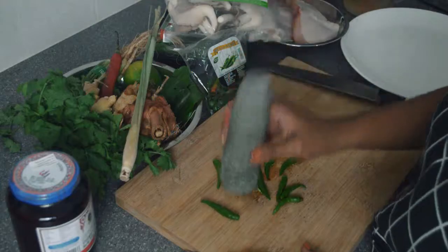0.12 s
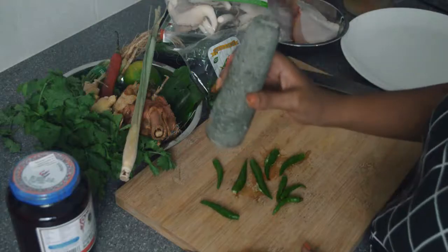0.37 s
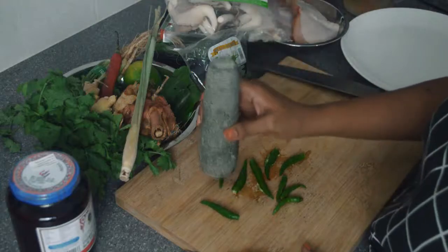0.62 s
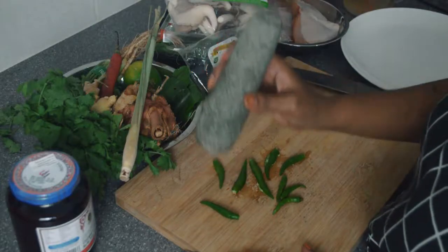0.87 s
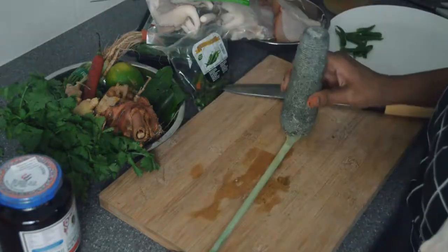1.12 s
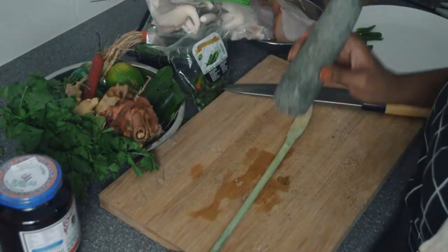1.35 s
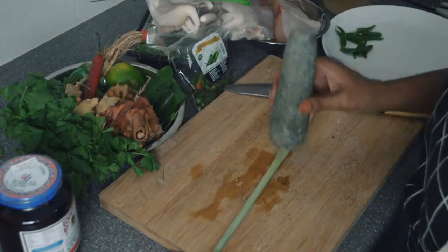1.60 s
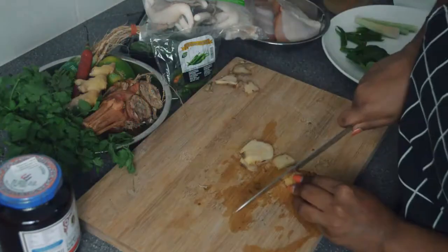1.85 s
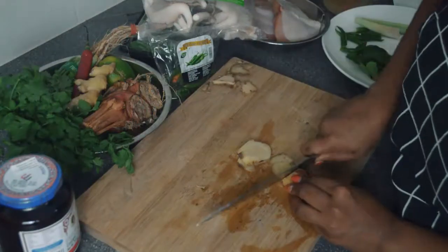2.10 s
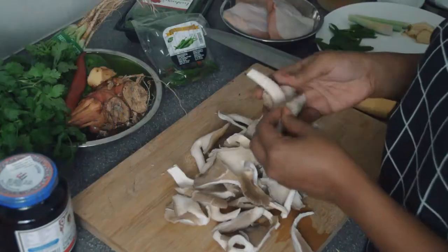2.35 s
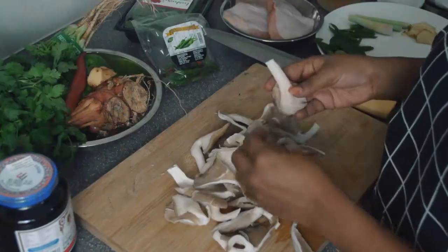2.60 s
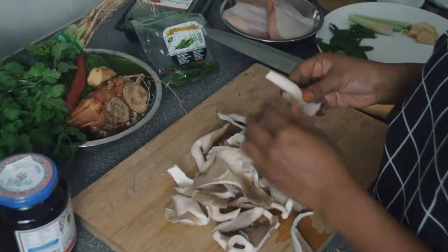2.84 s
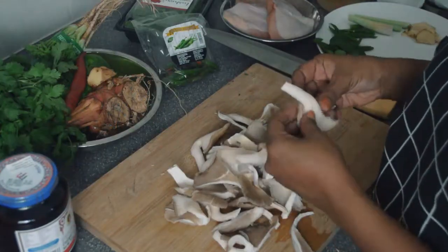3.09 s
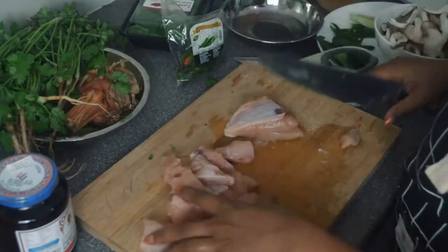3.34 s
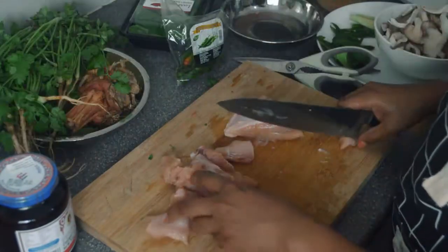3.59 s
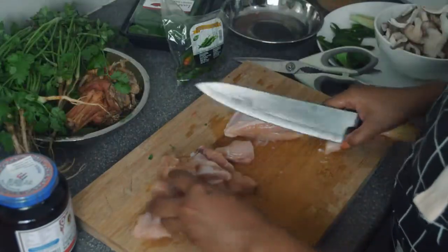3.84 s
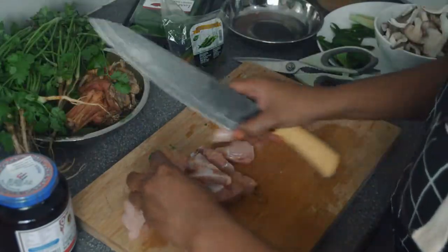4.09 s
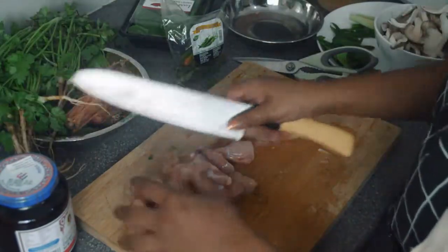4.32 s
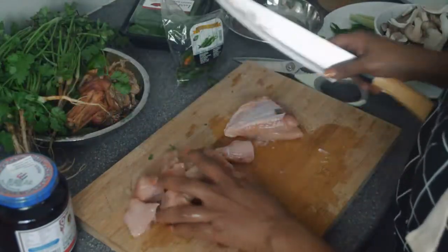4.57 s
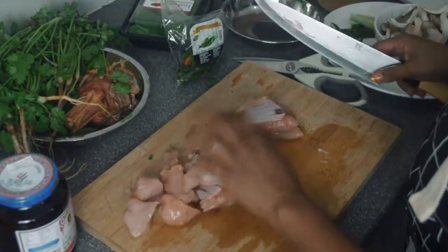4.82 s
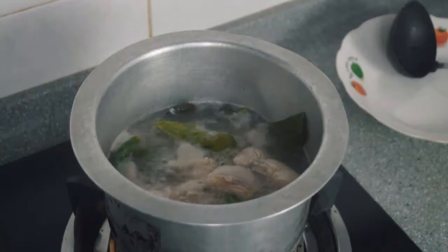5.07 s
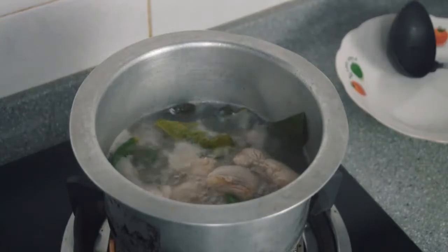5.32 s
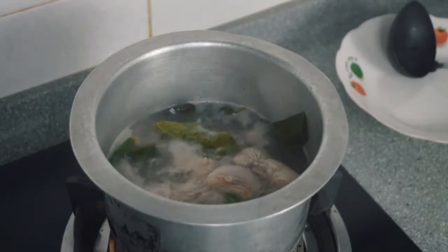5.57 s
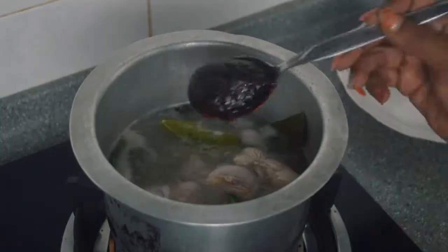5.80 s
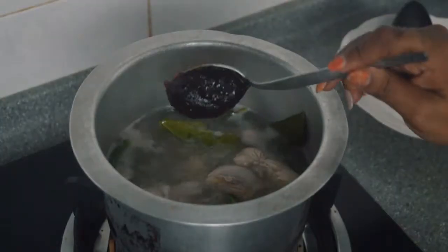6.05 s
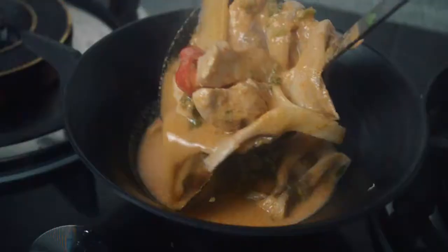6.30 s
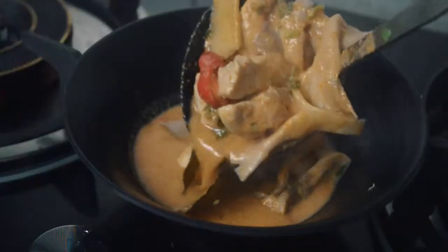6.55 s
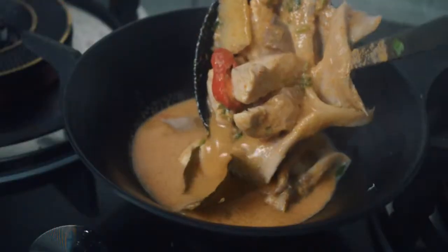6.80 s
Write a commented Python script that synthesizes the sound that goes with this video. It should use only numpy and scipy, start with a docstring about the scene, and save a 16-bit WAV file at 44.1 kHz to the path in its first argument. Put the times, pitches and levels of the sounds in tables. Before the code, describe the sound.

Loud start, quiet finish: two crunchy pestle knocks, two heavier ones with rattling metal, then a short slice ending in a sharp wooden knock. After that come soft wet rustles and small taps on the board, a faint fizzing pot with tiny snaps and bubble plops, and a low wavering fan hum. Close mono pickup in a lively kitchen; each scene change cuts off the previous echo abruptly.

```python
"""Quick cuts through a home kitchen

A stone pestle pounds a wooden board four times: crackling grains, a struck board and loose clatter, with
metal ware jingling beside it. A knife hisses through a root and lands, hands rustle and tap food about in
puffs of noise, a pot simmers in tiny chirps, snaps and plops, and a stove fan hums as wavering sines.
Coloured noise gives each scene its room tone, and each cut chops off the echo of the scene before it."""
import sys
import numpy as np
from scipy import signal
from scipy.fft import rfft, irfft
from scipy.io import wavfile
from scipy.ndimage import uniform_filter1d

SR = 44100
rng = np.random.default_rng(int(sys.argv[2]) if len(sys.argv) > 2 else 0)


def store_wav(level_fs):
    """Save 16-bit WAV to argv[1]."""
    pcm = np.round(np.clip(np.atleast_2d(level_fs), -1, 1) * 32767)
    wavfile.write(sys.argv[1], SR, pcm.T.astype(np.int16))


def to_linear_factor(level_db):
    """Convert decibel levels (scalar or array-like) to linear amplitude factors."""
    exponent = np.asarray(level_db, float) / 20
    return 10 ** exponent


N = 305436
T = np.arange(N) / SR  # the time line in seconds


def evened(x):
    """Scales to rms 1."""
    return x / np.sqrt(np.mean(x ** 2) + 1e-20)


def read(points, hz):
    """Reads a spectrum on a log frequency axis."""
    f, value = np.transpose(points)
    return np.interp(np.log(hz + 1), np.log(f + 1), value)


def coloured(x, points):
    """Shapes the spectrum without shifting phases; rms 1."""
    gain = to_linear_factor(read(points, np.fft.rfftfreq(len(x), 1 / SR)))
    return evened(irfft(rfft(x) * gain, len(x)))


def band(x, hz, octaves):
    """Band-pass reaching the given octaves to each side of hz."""
    edges = np.clip([hz / 2 ** octaves, hz * 2 ** octaves], 30, SR / 2.2)
    return signal.sosfilt(signal.butter(2, edges, "bandpass", fs=SR, output="sos"), x)


def ring(modes, place_hz=900, focus_db=0, split=0):
    """Decaying sines, peak 1; modes far from place_hz are struck less; split pairs beat."""
    t = np.arange(SR // 2) / SR
    out = 0
    for k, (hz, db, t60) in enumerate(modes):
        off_place_db = focus_db * np.log2(hz / place_hz) ** 2
        struck = (-1) ** k * to_linear_factor(db - off_place_db - 60 * t / t60)  # neighbours start in opposite directions
        twin = 0.64 * np.sin(2 * np.pi * hz * (1 + split) * t)
        out = out + struck * (np.sin(2 * np.pi * hz * t) + twin)
    return out / abs(out).max()


def grains(size, spread_db, per_s, hiss):
    """Sparse clicks of very unequal size over some plain hiss."""
    chance = rng.random((size, 2))
    noise = rng.standard_normal((size, 2))
    sizes = to_linear_factor(-spread_db * np.log(chance[:, 0] + 0.078))
    clicks = sizes * (chance[:, 1] < per_s / SR)
    return evened(clicks * np.sign(noise[:, 0])) + hiss * noise[:, 1]


def rustle(colour, spread_db, per_s, hiss, blur):
    """Friction: noise in uneven puffs that last about blur (s)."""
    puffs = signal.lfilter([1], [1, -np.exp(-1 / (blur * SR))], abs(grains(N, spread_db, per_s, 0)))
    return coloured((evened(puffs) + hiss) * rng.standard_normal(N), colour)


# How long the kitchen echoes. Each row: frequency in Hz, t60 in seconds.
ROOM = [(60, 0.53), (160, 0.32), (420, 0.54), (1100, 0.49), (2910, 0.46), (7680, 0.39), (11000, 0.41),
        (15000, 0.067)]


def room(x, wet_db):
    """Hard kitchen walls: sparse taps of random sign, each band dying at its own speed."""
    taps, at = np.zeros(SR), np.arange(120, SR - 10, 10)
    taps[at + rng.integers(0, 10, len(at))] = rng.choice([-1., 1.], len(at))
    hz, t, z = signal.stft(taps, SR, nperseg=512)
    decay = to_linear_factor(-60 * t / read(ROOM, hz)[:, None])
    tail = signal.istft(z * decay, SR, nperseg=512)[1][:SR]
    wet = signal.fftconvolve(x, tail / np.linalg.norm(tail))[:SR]
    return to_linear_factor(wet_db) * wet + np.pad(x, (0, SR - len(x)))


# The edges of the six scenes, counted from 0. One row: times in seconds.
CUTS = [.083, 1.0, 1.768, 2.268, 4.902, 6.328, 7]


def scene_at(s):
    """Number of the scene that is heard at s."""
    return int(np.searchsorted(CUTS, s)) - 1


def add(mix, s, sound, scene_number):
    """Mixes a sound in at s, heard only between the two cuts of its scene."""
    at = round(s * SR) + np.arange(len(sound))
    heard = (at >= CUTS[scene_number] * SR) & (at < min(CUTS[scene_number + 1] * SR, N))
    mix[at[heard]] += sound[heard]


def fade_in():
    """Gain in dB of the fade that opens the pot scene."""
    from_db, fade_s = -15.5, 0.35
    since = T - CUTS[4]
    return from_db * np.clip(1 - (since / fade_s) ** 2, 0, 1) * (since > 0)


def strokes(rows, number):
    """Each stroke swells to its peak and dies away; gains of the main layer and of the second one."""
    range_db = 29  # drop below the peak at the far end of a rise or fall
    main, second = np.zeros((2, N))
    for s, db, rise, fall, second_db in rows:
        power = to_linear_factor(db - range_db * np.maximum((s - T) / rise, (T - s) / fall)) ** 2
        main = main + power
        second = second + power * to_linear_factor(second_db) ** 2
    return np.sqrt([main, second]) * (T > CUTS[number]) * (T < CUTS[number + 1])


# What is struck: chilli, stalk, root. Each row: contact in seconds, delay of the wood in seconds,
# weight on the counter in dB, board mode struck hardest in Hz, clatter rise in seconds.
FOODS = [(0.00092, 0.0013, -9.5, 1300, 0.0019), (0.0014, 0.0073, -9, 470, .016),
         (0.00023, 0.00068, -34.5, 1500, 0.0022)]
# Resonances of the counter under the board. Each row: frequency in Hz, strength in dB, t60 in seconds.
COUNTER = [(56, -10.5, .3), (150, 0.5, .045), (98, -14.5, 0.31), (141, -9, 0.13), (224, -14, 0.023),
           (330, -15.5, .05)]
# Resonances of the wooden board. Each row: frequency in Hz, strength in dB, t60 in seconds.
BOARD = [(390, -1, .07), (500, -3, .05), (571, -2, .06), (790, 2, .06), (900, 0, .04), (1190, -3, .04),
         (1330, -3, .04), (1470, -3, .04), (1640, -1, .04), (1800, 0, .04), (2250, -7, .03),
         (3000, -9, .025)]
# Colour of the loose things on the counter. Each row: frequency in Hz, level in dB per Hz.
CLATTER = [(88, -44), (150, -3), (883, -3.5), (1510, -5.5), (1870, -8), (2020, -7), (2750, -13),
           (9630, -36.5), (15000, -51)]


def blow(crunch_db, length, board_db, clatter_db, food):
    """The food cracks, the wood is struck through it, and everything on the counter jumps."""
    contact, delay, counter_db, place_hz, rise = FOODS[food]
    t = np.arange(SR // 2) / SR
    parts = rng.integers(0, 4, len(t)) == np.arange(4)[:, None]  # grit shared at random among four parts
    grit = parts * grains(len(t), 4.1, 4400, 0.44)
    crunch = evened(band(grit, 4800, 0.91)) + 0.41 * evened(band(grit, 1400, 0.35))
    crunch = to_linear_factor(crunch_db) * crunch * np.exp(-(t / length) ** 2) * np.tanh(t / 0.00034)

    late = np.maximum(t - delay, 0)
    push = np.sin(np.pi * np.clip(late / contact, 0, 1)) ** 2  # a longer contact is a duller knock
    wood = to_linear_factor(board_db) * ring(BOARD, place_hz, focus_db=4.5)
    knock = -signal.fftconvolve(push / push.sum(), wood)[:len(t)]
    thump = to_linear_factor(counter_db) * ring(COUNTER) * np.tanh(t / 0.0016)  # the counter takes the weight at once

    clatter_t60 = 0.11 + 13 * length  # a longer crush shakes the counter for longer
    clatter = coloured(grains(len(t), 2.6, 1500, 0.5), CLATTER)
    clatter = clatter * to_linear_factor(clatter_db - 60 * late / clatter_t60) * np.tanh(late / rise)

    wet_db = -6.5
    cracks = sum(room(part, wet_db) for part in crunch)  # each part gets its own echo: an even tail
    # Bass comes mostly straight through the counter, so the thump gets less room.
    return room(knock + clatter, wet_db) - room(thump, -9.5) + cracks


# Four pestle blows, then the knife landing. Each row: start in seconds, crunch level in dB,
# crunch length in seconds, board level in dB, clatter level in dB.
BLOWS = [(0.173, -27, 0.007, -10.5, -13), (0.5553, -16, 0.011, -19, -17.5), (1.0557, -18.5, 0.0075, -8, -3),
         (1.462, -20.5, 0.011, -6.5, -10), (2.0234, -32, 0.003, -7, -24)]
# Blows just before a cut, heard only by their echo. Each row: start in seconds, level in dB, scene number.
EARLIER = [(-.2, -10.5, 0), (0.702, -9.5, 1)]


def pounding():
    """All blows on the board, and the echoes that reach across a cut."""
    out = np.zeros(N)
    for s, *how in BLOWS:
        add(out, s, blow(*how, food=scene_at(s)), scene_at(s))
    for s, db, number in EARLIER:
        add(out, s, to_linear_factor(db) * blow(*BLOWS[2][1:], food=1), int(number))
    return out


def jingle(modes, shakes, earliest=0):
    """A dying run of tiny knocks keeps re-striking the metal, so its tones are rough."""
    out, t = np.zeros(N), np.arange(SR // 2) / SR
    for s, db, t60 in shakes:
        knocks = grains(len(t), 0.79, 1500, 0.22) * to_linear_factor(-60 * t / t60)
        sound = signal.fftconvolve(knocks / np.linalg.norm(knocks), ring(modes, split=0.0047))[:SR]
        add(out, s, to_linear_factor(db) * room(sound, -2), max(scene_at(s), earliest))
    return out


# Resonances of a bowl, a blade and a tray. Each row: frequency in Hz, strength in dB, t60 in seconds.
BOWL = [(7499, -8, .2), (9464, -2, .07), (11220, -9, .1), (12810, -4, .1), (15700, -12, .08)]
BLADE = [(1179, 1, .7), (1852, -5, .3), (1995, 2, .25), (2595, -4, .25), (3180, -6, .2), (4195, 0, .16),
         (5593, -4, .2), (7144, -11, .2)]
TRAY = [(2148, -8, .3), (3079, -4, .25), (4194, -2, .2), (5383, 0, .15), (6718, -7, .2), (7849, -9, .2),
        (8764, -7, .15), (10050, -10, .15)]
# When each is set jingling. Each row: start in seconds, level in dB, t60 of the shaking in seconds.
BOWL_SHAKES = [(.182, -23, .07), (1.075, -30, .1), (1.47, -38, .1)]
BLADE_SHAKES = [(1.066, -17, .15), (1.09, -12, .2), (1.468, -14, .2)]
TRAY_SHAKES = [(1.74, -41, .3), (1.93, -48, .2)]


def metal_ware():
    """Bowl, blade and tray ring at their own modes; the tray is heard only in the knife scene."""
    bowl_and_blade = jingle(BOWL, BOWL_SHAKES) + jingle(BLADE, BLADE_SHAKES)
    return bowl_and_blade + jingle(TRAY, TRAY_SHAKES, earliest=2)


# Knife hiss, the slice and a fibre snapping. Each row: time of the peak in seconds, level in dB,
# rise in seconds, fall in seconds, highest treble in dB relative to that level.
SLICE = [(1.88, -61, .06, .2, -18), (2.022, -33.5, 0.094, 0.113, -17.5), (2.086, -32.5, 0.027, .022, -7.5)]
# Colour of the slicing friction. Each row: frequency in Hz, level in dB per Hz.
SLICE_COLOUR = [(180, -26), (300, 8.5), (1240, -10.5), (1700, -8), (1970, -12), (2400, -15), (5300, -14.5),
                (15500, -9.5)]


def knife():
    """The blade hisses through the root; the snap is brightest; the walls carry it on."""
    main, bright = strokes(SLICE, number=2)
    sound = rustle(SLICE_COLOUR, 2.6, 2100, 0.6, 0.0015)
    top = evened(band(sound, 13000, 0.2)) * bright
    below = evened(band(band(sound, 2500, 2), 2500, 2)) * main
    from_cut = (top + below)[round(CUTS[2] * SR):][:SR]
    out = np.zeros(N)
    add(out, CUTS[2], room(from_cut, -7.5), scene_number=2)
    return out


# Wet rustle of handled food. Each row: time of the peak in seconds, high hiss level in dB,
# rise in seconds, fall in seconds, lower scrape in dB relative to the hiss.
HANDS = [(3.078, -70, 0.27, .6, -5.5), (3.358, -56.5, .008, 0.09, 6), (3.47, -61.5, 0.22, .13, -1.5),
         (3.558, -61.5, .02, .5, -5.5), (3.91, -61.5, 0.97, 0.3, 0.5), (4.208, -72, .18, 0.24, -6.5),
         (4.426, -66, 0.024, 0.086, -2), (4.67, -72, .11, 0.17, -6.5)]
# Colour of the rustle. Each row: frequency in Hz, level in dB per Hz.
HANDS_COLOUR = [(880, -6.5), (1500, -2), (1700, -1.5), (1930, -9), (3870, 0), (8130, -5), (11100, -9),
                (15500, -37)]
# Pitch of the scrape, climbing through the long stroke and then sinking. Each row: time in seconds,
# frequency in Hz.
SCRAPE = [(3.7, 1500), (3.95, 2860), (4.0, 2310)]


def hands():
    """A high wet hiss, a lower scrape and a dull shuffle share the same strokes."""
    hiss, scrape = strokes(HANDS, number=3)
    sound = rustle(HANDS_COLOUR, 2.4, 200, 1.2, 0.004)
    pitch_hz = np.interp(T, *np.transpose(SCRAPE), left=2300)
    carrier = np.cos(2 * np.pi * np.cumsum(pitch_hz) / SR)
    gliding = carrier * band(rng.standard_normal(N), 106, 2.03)  # a noise band that follows the scrape pitch
    rasp = evened(band(sound, 1900, 0.75)) + 0.54 * evened(gliding)
    # Food dragging on the wood.
    shuffle = to_linear_factor(-2.5) * evened(band(rng.standard_normal(N), 353, 0.79)) * hiss
    return evened(rasp) * scrape + evened(band(sound, 7700, 0.66)) * hiss + shuffle


# Small taps and smacks on the board. Each row: start in seconds, level in dB, centre in Hz,
# knock of the wood in dB.
TAPS = [(3.0489, -63, 1947, -53.5), (3.2194, -63, 2027, -73), (3.2792, -59.5, 1950, -74.5),
        (3.3559, -32, 5440, -38), (3.5556, -43.5, 3400, -56), (3.7197, -49, 6110, -69),
        (3.8372, -43, 5490, -60), (3.9527, -43.5, 4800, -66), (3.9953, -45, 9000, -58),
        (4.0974, -45.5, 5600, -64), (4.421, -44.5, 3480, -63), (4.6312, -46, 9470, -52.5),
        (4.6593, -38, 7170, -66.5), (6.7178, -44, 1900, -62.5)]


def taps():
    """Each tap is a wide puff of noise with a knock of board and counter under it."""
    out, t = np.zeros(N), np.arange(SR // 4) / SR
    fade_db = 60 * t / 0.034  # t60 34 ms
    for s, db, hz, wood_db in TAPS:
        puff = evened(band(rng.standard_normal(len(t)), hz, 0.35)) * to_linear_factor(db - 12.5 - fade_db)
        wood = ring(BOARD + COUNTER, 500, focus_db=2)[:len(t)]
        add(out, s, room(puff + to_linear_factor(wood_db - fade_db) * wood, -3.5), scene_at(s))
    return out


# The loudest spits of the pot. Each row: start in seconds, level in dB, frequency in Hz.
SPITS = [(5.1888, -47.5, 9830), (5.2278, -38.5, 9940), (5.3804, -42, 10000), (5.4498, -46, 10100),
         (5.6724, -48, 9950), (5.7035, -37, 8580), (5.7527, -34, 9990), (5.8726, -37, 7690),
         (5.9436, -33, 9900), (6.0055, -42, 8270), (6.0627, -36, 7800), (6.1991, -40, 7050),
         (6.236, -44, 7390), (6.2589, -42, 6080)]


def spits():
    """Each spit is a snap of a cycle or two with a faint echo; the boil froths up once in a wide hiss."""
    out, t = np.zeros(N), np.arange(SR // 10) / SR
    for s, db, hz in SPITS:
        snap = np.sin(2 * np.pi * hz * t) * np.exp(-t / 0.000164) * np.tanh(t / 0.00006)
        add(out, s, to_linear_factor(db - 1.5) * room(snap / abs(snap).max(), -14.5), scene_at(s))
    surge_s, surge_length_s, surge_db = 5.55, 0.032, -57.5
    froth = evened(band(rng.standard_normal(N), 4000, 1.8))
    return out + to_linear_factor(surge_db) * froth * np.exp(-((T - surge_s) / surge_length_s) ** 2)


# Large bubbles bursting. Each row: start in seconds, level in dB, starting pitch in Hz.
PLOPS = [(5.313, -65, 800), (5.379, -55.5, 736), (5.67, -49.5, 901), (5.795, -52.5, 960),
         (6.016, -47.5, 840), (6.055, -52, 730), (6.208, -60, 960), (6.311, -48, 976)]


def plops():
    """Each large bubble is a short rising tone with a noisy splash around it."""
    out, t = np.zeros(N), np.arange(SR // 4) / SR
    for s, db, hz in PLOPS:
        splash = 0.63 * evened(band(rng.standard_normal(len(t)), 1.04 * hz, 0.57))
        tone = np.sin(2 * np.pi * hz * t * (1 + 12 * t))
        envelope = np.tanh(t / 0.00027) * to_linear_factor(db - 60 * t / 0.038)  # t60 38 ms
        add(out, s, room((tone + splash) * envelope, -7.0), scene_at(s))
    return out


# Colour of the simmer. Each row: frequency in Hz, level in dB per Hz.
SIMMER_COLOUR = [(1760, -40), (3000, -13.5), (3980, -11), (4290, -6), (4660, -7), (9920, 0.5),
                 (11100, -2.5), (15500, -18)]


def fizz():
    """Tiny bubbles pop at the surface: short chirps at their own pitch, wider snaps, and a hiss."""
    t, chirps = np.arange(400) / SR, np.zeros(N)
    for hz in np.geomspace(4500, 14000, num=16):
        pop = np.sin(2 * np.pi * hz * t * (1 + 60 * t)) * np.exp(-t / 0.0005) * np.tanh(t / 0.0002)
        chirps += signal.oaconvolve(grains(N, 2.5, 25, 0), pop)[:N]
    walls = np.exp(-np.arange(2000) / 350) * rng.standard_normal(2000) * 0.025  # flutter inside the pot
    pops = coloured(chirps + signal.oaconvolve(chirps, walls)[:N], SIMMER_COLOUR)
    snaps = rustle(SIMMER_COLOUR, 5.1, 70, 1.0, 0.0024)
    showing = (T > CUTS[4]) * (T < CUTS[5])
    return evened(0.6 * pops + snaps) * to_linear_factor(-60.5 + fade_in()) * showing


# Blade tones of the stove fan. Each row: frequency in Hz, rms level in dB.
FAN = [(236.9, -59), (952.8, -74), (1195, -81.5), (1432, -79), (1911, -84)]


def fan():
    """Blade tones that waver a little together."""
    waver = evened(uniform_filter1d(rng.standard_normal(N), 3000))
    turn = 2 * np.pi * np.cumsum(1 + 0.0017 * waver) / SR
    tones = sum(to_linear_factor(db) * np.sqrt(2) * np.sin(hz * turn) for hz, db in FAN)
    return tones * (T > CUTS[5])


# Colour of the room tone. Each row: frequency in Hz, level in dB per Hz.
AIR = [(15, -69), (25, -31.5), (63, -10.5), (86, -0.5), (123, -10.5), (189, -7.5), (248, -13), (291, -8),
       (461, -15), (587, -14), (637, -14), (691, -12.5), (2460, -23), (3300, -25.5), (15800, -37)]
# Room tone of each scene in turn. Each row: level in dB, tilt in dB per octave.
AIR_LEVEL = [(-59.5, -0.7), (-57, -0.45), (-57.5, .4), (-60.5, -0.24), (-59.5, 0.47), (-61, 0.18)]


def air():
    """Room tone: random short-time spectra with drifting patches, tilted to suit each scene."""
    frames, hz = N // 512 + 5, np.fft.rfftfreq(2048, 1 / SR)
    a, b, patches = rng.standard_normal((frames, 1025, 3)).T
    patches = evened(uniform_filter1d(uniform_filter1d(patches, 20, 0), 8, 1))
    db, tilt = np.transpose(AIR_LEVEL)[:, np.searchsorted(CUTS[1:-1], T)]
    frame_tilt = np.interp(np.arange(frames) * 512 / SR, T, tilt)
    slope = frame_tilt * np.log2((hz[:, None] + 30) / 500)
    z = (a + 1j * b) * to_linear_factor(read(AIR, hz)[:, None] + 0.44 * patches + slope)
    noise = evened(signal.istft(z, nperseg=2048, noverlap=1536)[1][:N])
    return noise * to_linear_factor(db + fade_in()) * (T > CUTS[0])


def scene():
    """All sources on one time line, as one channel."""
    board = pounding() + metal_ware() + knife() + hands() + taps()
    pot = spits() + plops() + fizz()
    return (board + pot + fan() + air())[None]


def low_pass(x):
    """Removes everything above the highest recorded frequency."""
    return signal.sosfilt(signal.butter(12, 15950, fs=SR, output="sos"), x)


def record(dry):
    """The microphone drops the deepest bass and the top treble, and peaks are softly clipped."""
    mic = signal.sosfilt(signal.butter(3, [43, 15500], "bandpass", fs=SR, output="sos"), dry)
    mix = 1.076 * np.tanh(mic / 0.97)
    return low_pass(mix)


dry = scene()
out = record(dry)
store_wav(out)
```